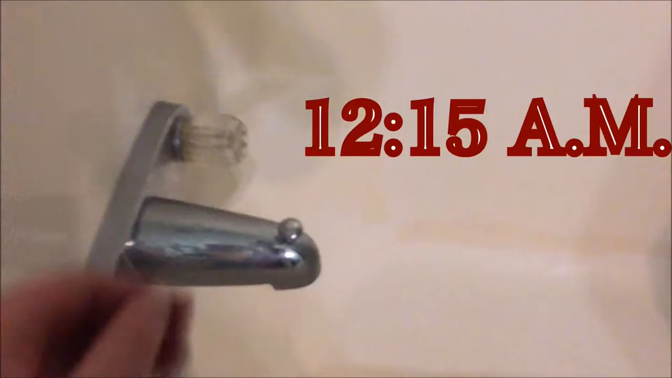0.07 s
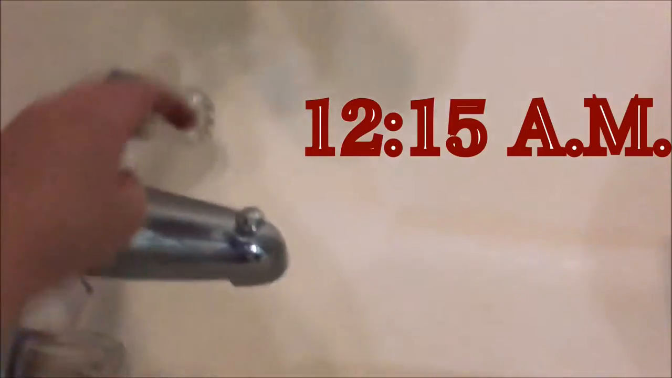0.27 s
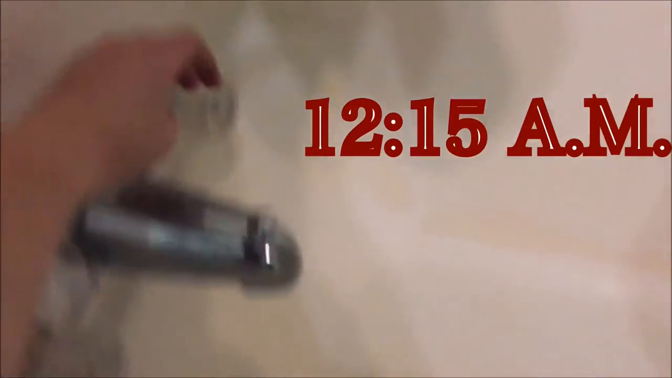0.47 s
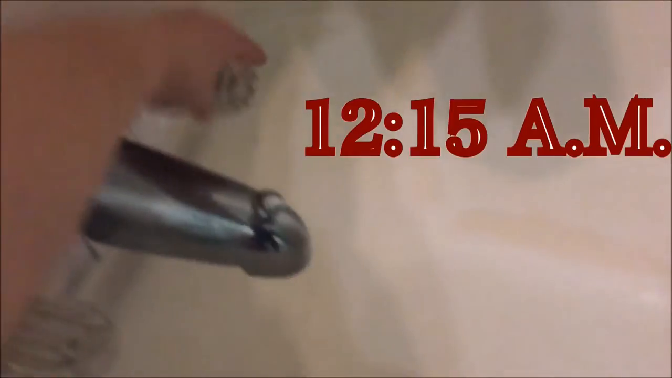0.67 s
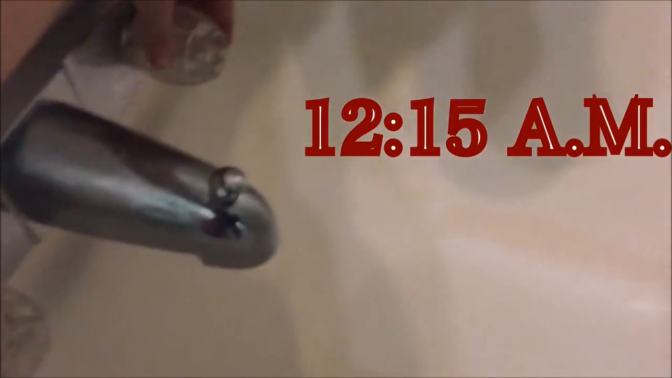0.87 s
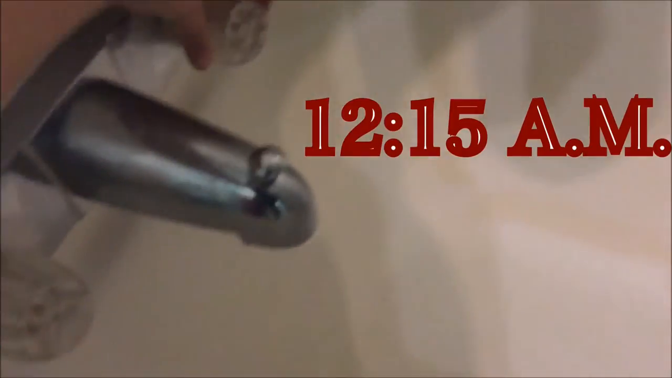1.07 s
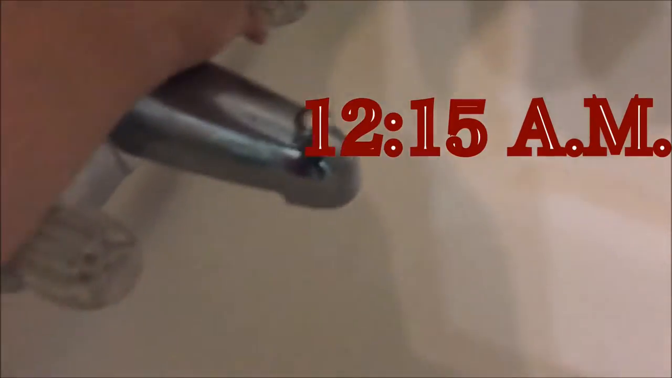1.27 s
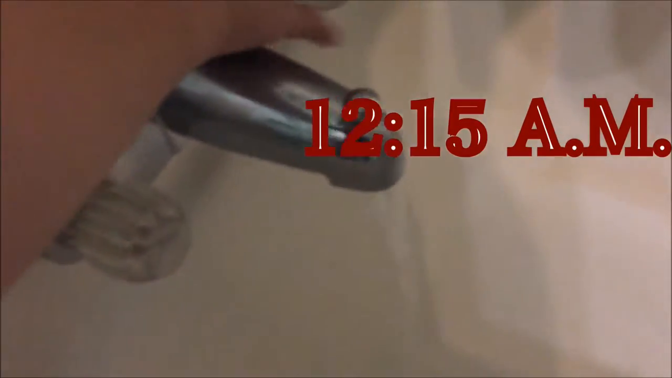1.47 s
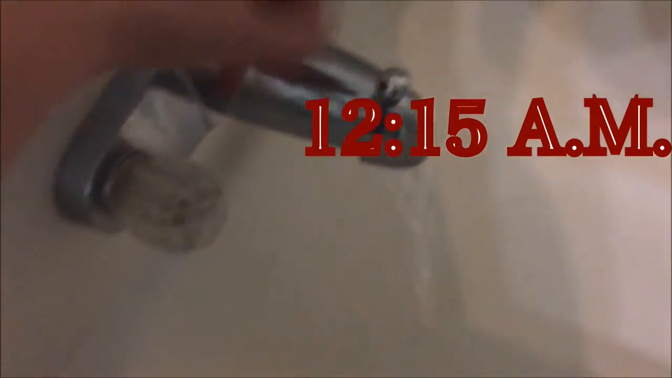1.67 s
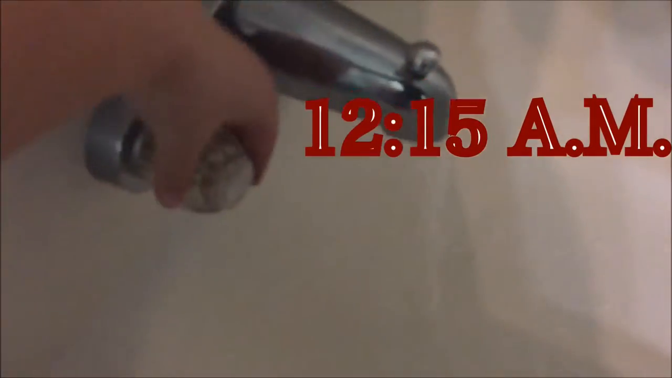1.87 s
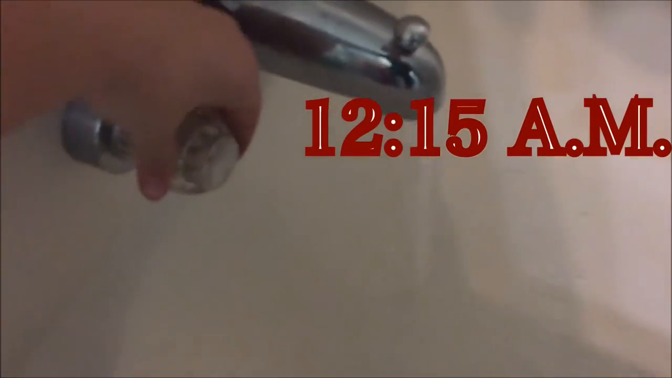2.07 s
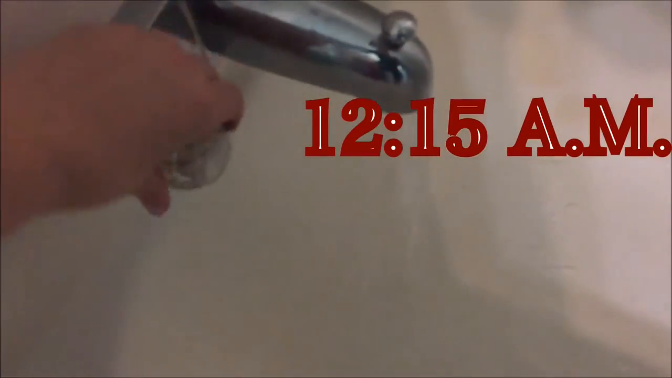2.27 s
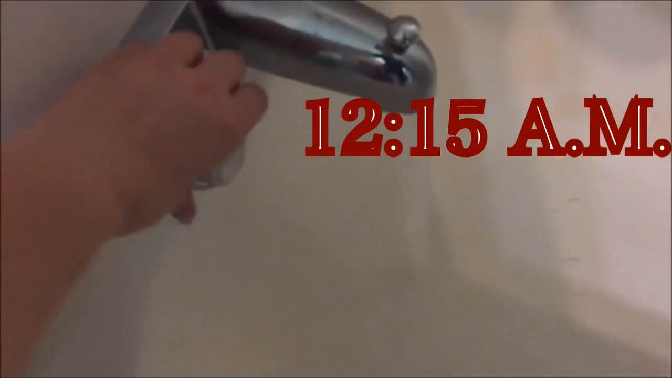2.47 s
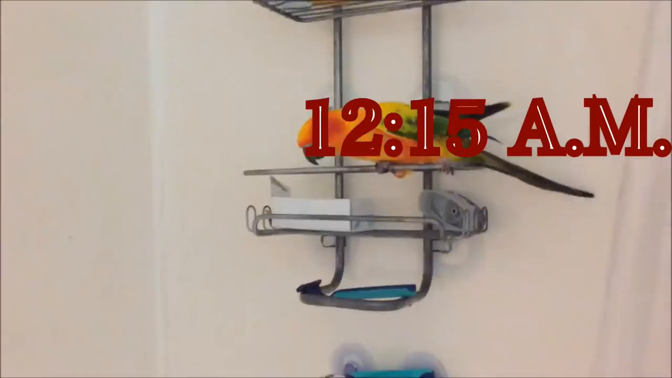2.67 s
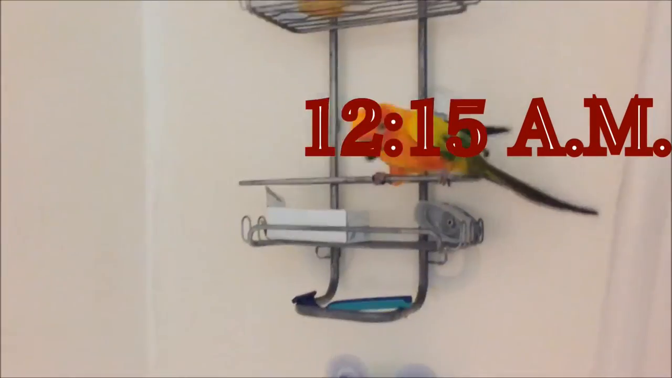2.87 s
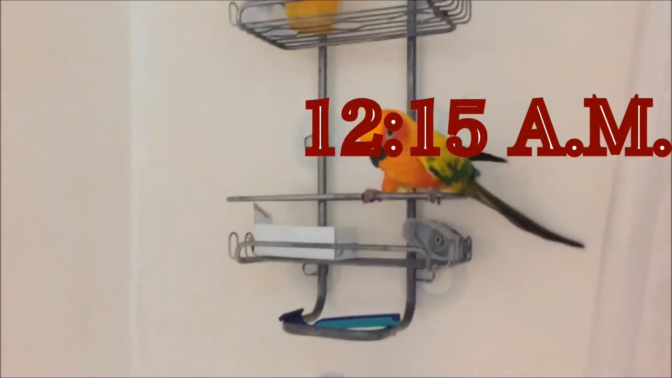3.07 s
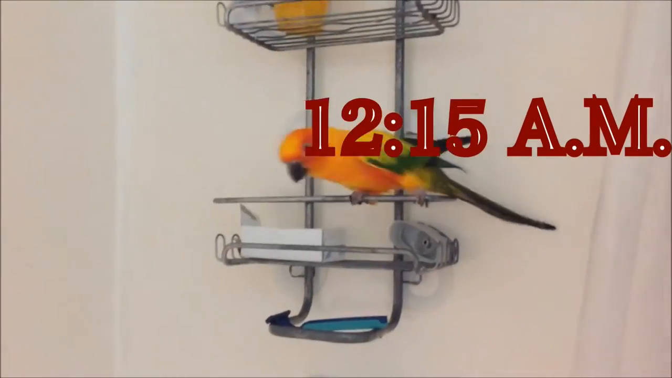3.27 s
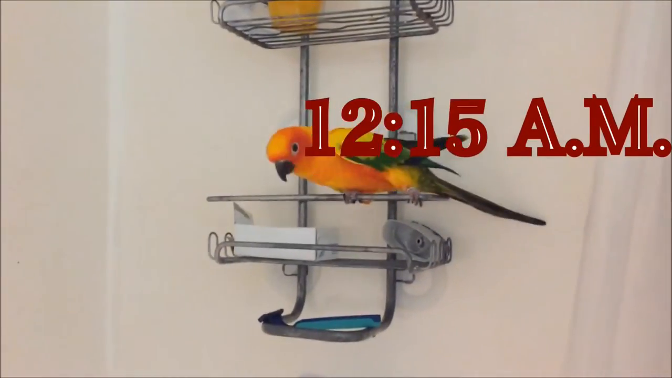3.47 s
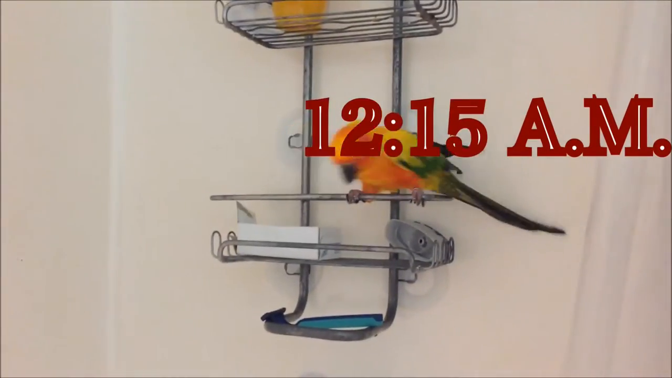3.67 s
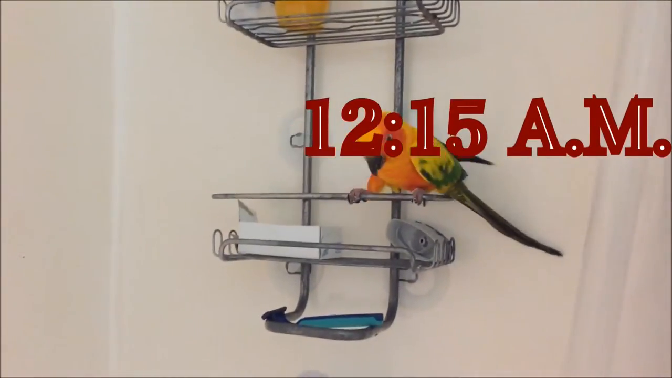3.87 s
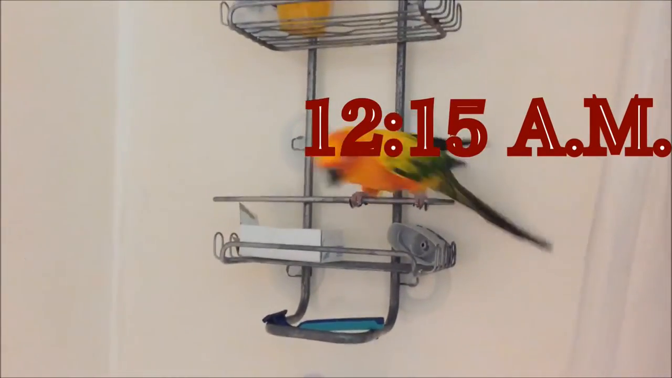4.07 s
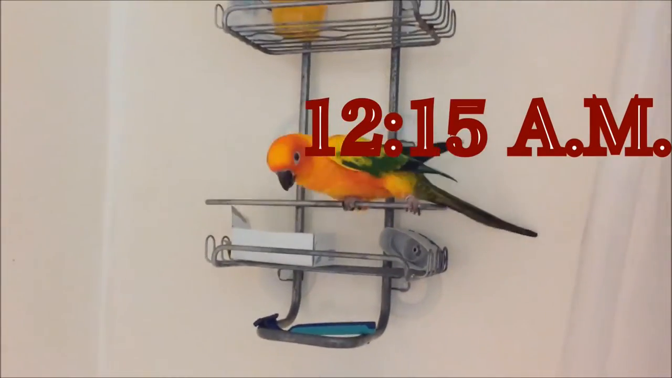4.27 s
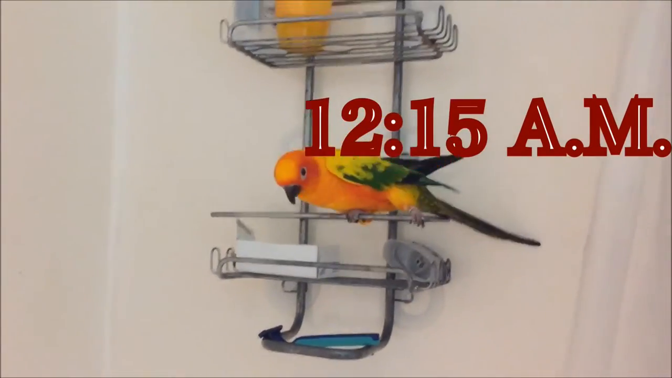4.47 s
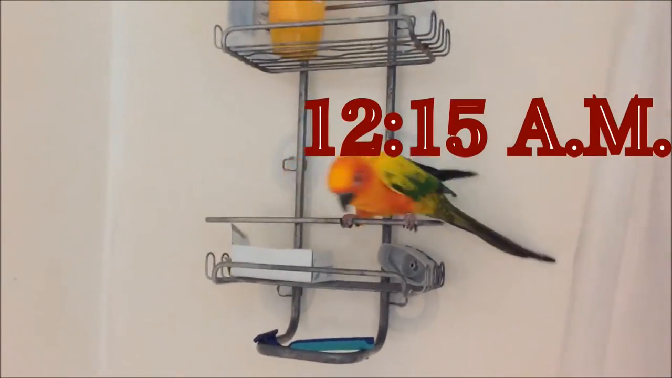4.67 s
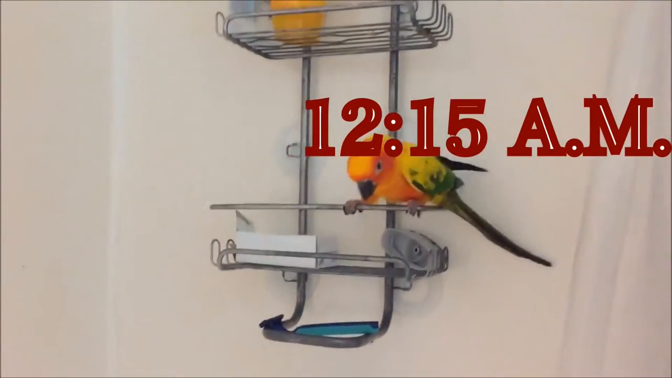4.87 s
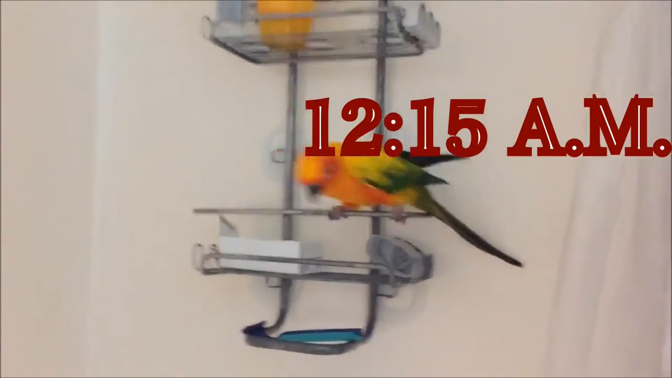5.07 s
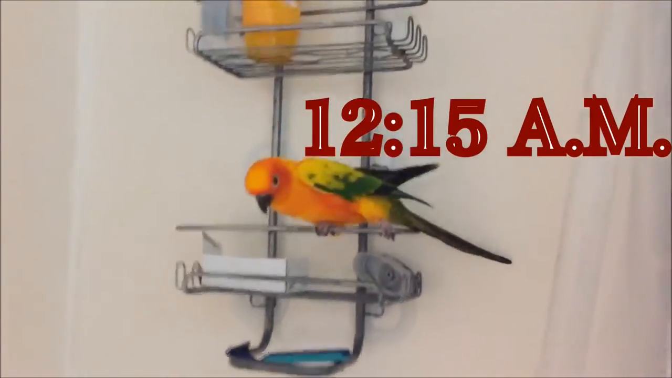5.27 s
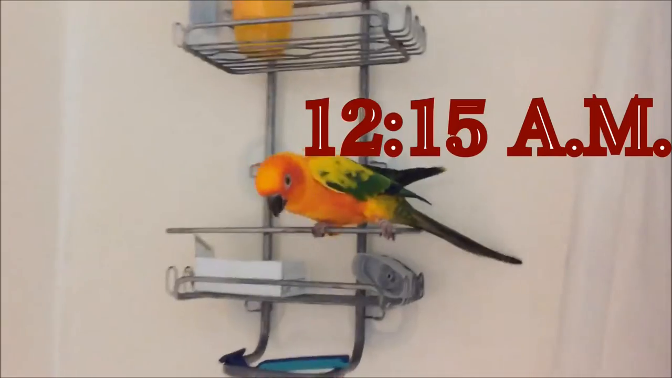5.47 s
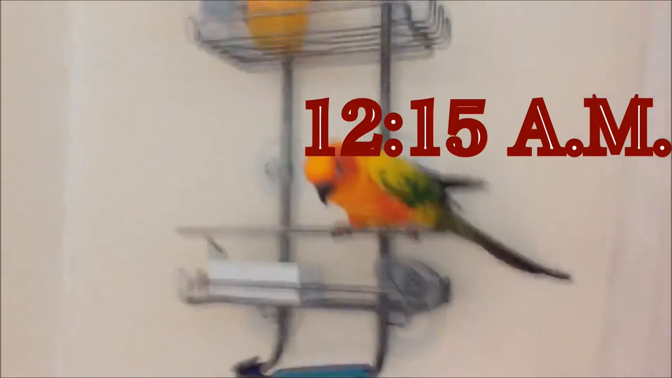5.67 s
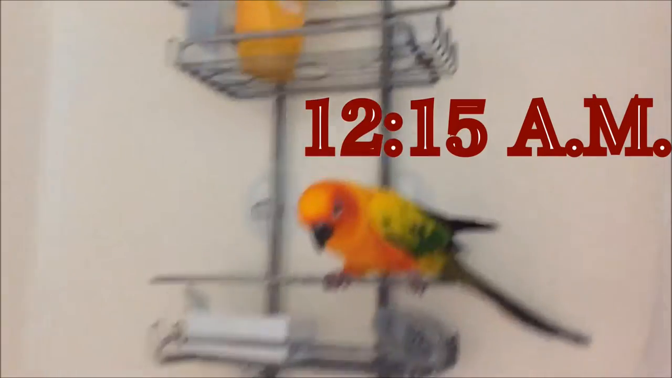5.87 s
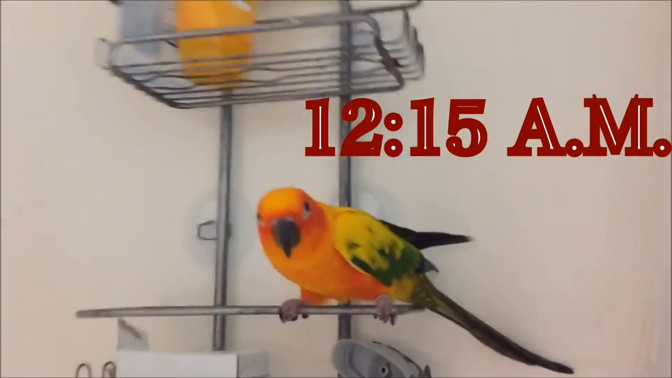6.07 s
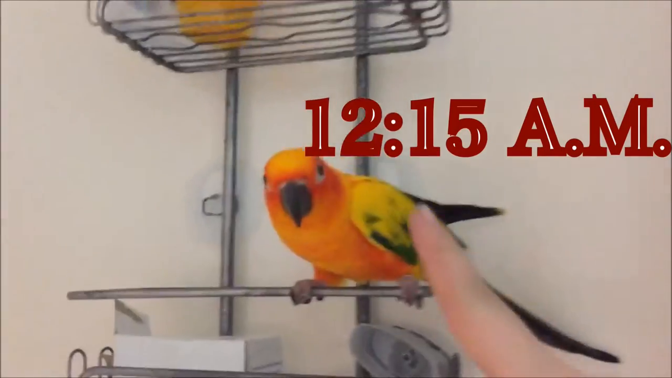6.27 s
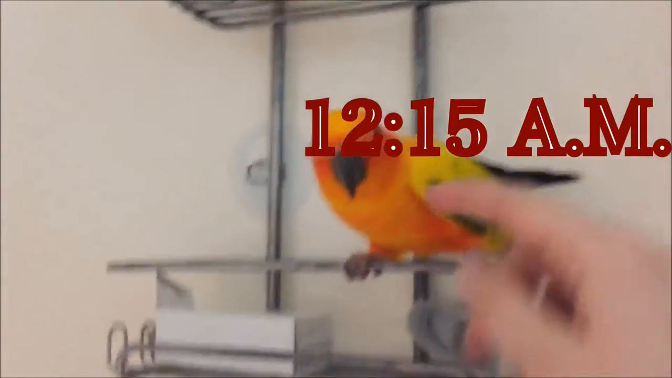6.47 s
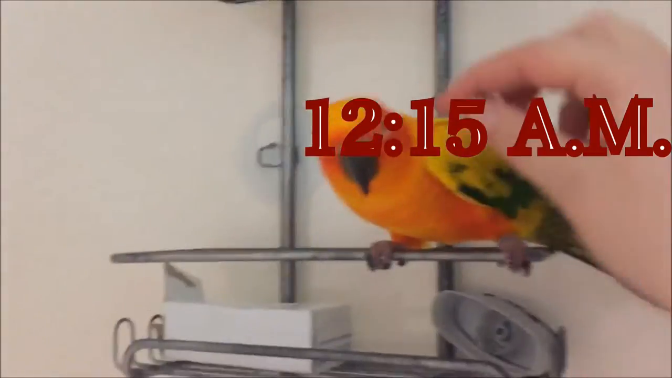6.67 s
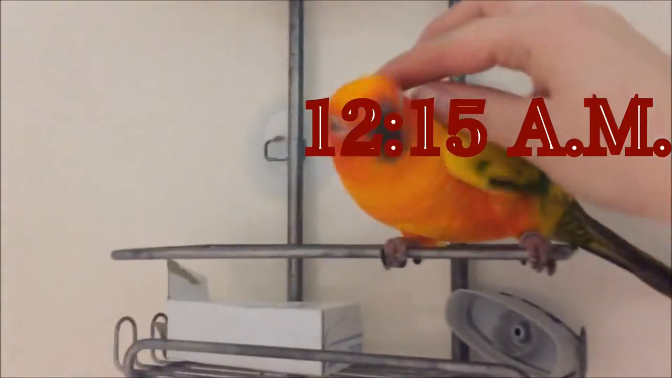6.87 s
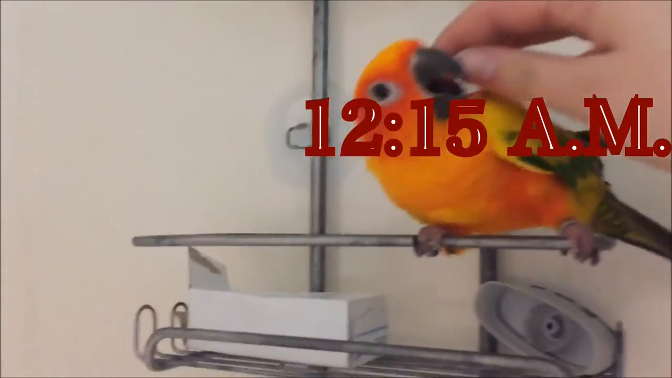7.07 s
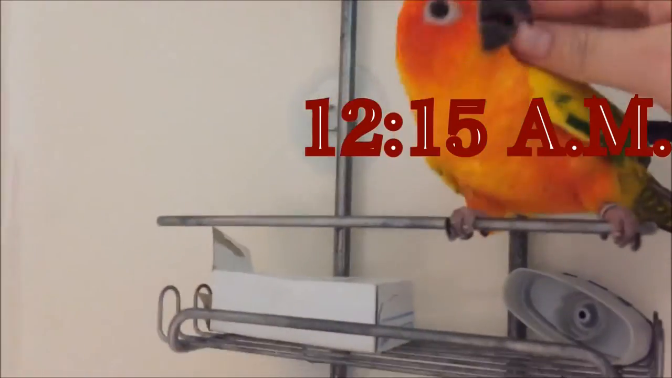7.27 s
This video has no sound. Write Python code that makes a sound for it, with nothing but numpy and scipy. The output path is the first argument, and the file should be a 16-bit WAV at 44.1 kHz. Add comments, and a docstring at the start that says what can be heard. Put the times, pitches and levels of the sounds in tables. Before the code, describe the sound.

Close to a bath spout: near silence, a cluster of metallic valve knocks with a low wall thud, then water spraying in, uneven as the knobs click sharply. Farther from the tap, the stream runs steadily with a hollow tub drone. Over it a parrot screeches, brief, nasal and harsh, with short bright tile echoes. After a gap comes one last, nearest blast. The automatic recording level pumps down after each call.

```python
"""A parrot on the shower rack gives seven piercing screeches: overtones of one pitch, shaped by its throat.
A bathtub tap is opened with a knock of the valve, modelled as a noise crack and decaying modes.
Water, as patchy noise and ringing drops, hisses into the tub while the knobs tick.
The tiles answer the parrot, knocks, ticks and squeaks with a short decaying tail.
Each screech overloads the recorder and pushes its gain down, so the water ducks and swells back."""
import sys
import numpy as np
from scipy import signal
from scipy.fft import rfft, irfft, next_fast_len
from scipy.io import wavfile
from scipy.ndimage import uniform_filter1d, minimum_filter1d, map_coordinates

SR = 44100
rng = np.random.default_rng(int(sys.argv[2]) if len(sys.argv) > 2 else 0)


def wav_out(sig):
    """Save sig, one row per channel (or a flat mono array), as 16-bit PCM at SR to the path in sys.argv[1]."""
    wavfile.write(sys.argv[1], SR, np.round(np.clip(np.atleast_2d(sig).T, -1, 1) * 32767).astype(np.int16))


N = 322371

# Screeches. Each row: start in seconds, length in seconds, pitch in Hz, initial pitch offset in Hz,
# level in dB, brightness 0-1, strength of the doubled period in dB, roughness of the ending 0-1,
# level of the hoarse catch before it in dB.
SCREECH_CALLS = [(2.965, .101, 942.7, 10.5, 10, 0.14, -1, 0.4, -17.5),
                 (3.361, 0.1, 940.6, -12, 9.5, 0.2, 1, 0.15, -7.5),
                 (3.771, 0.11, 939, 15, 9.5, 0, 1.5, 0.46, -8.5),
                 (4.22, 0.11, 939.2, 18.5, 8.5, 0, 1.5, 0.6, -50),
                 (4.926, 0.097, 940.4, -7, 13, 0.47, 3.5, 0.67, -12),
                 (5.42, 0.087, 931.4, 9.5, 8.5, 0.8, 1, 0.8, -50),
                 (7.085, 0.11, 1012, 15, 28, 0.6, -0.5, 0.25, -31)]
# Throat resonances. Each row: centre in Hz, width in Hz, boost in dB in a dull call, boost in dB in a bright call.
THROAT_RESONANCES = [(1900, 400, 1.5, 0), (2850, 400, 1, 2), (5690, 1700, 5.5, -0.5),
                     (8650, 370, -7.5, 7.5)]
# Overtones of the voice, before the throat: level in dB at 1 to 16 times the pitch.
VOICE_OVERTONES_DB = [-29, -6.5, -5.5, 3, -12, -3, -10.5, -6.5, -7, -15.5, -20.5, -20.5, -17, -15.5, -19,
                      -22.5]
SAG_S = 0.0436  # time constant (s) of the pitch settling
SNAP_HZ, SNAP_S = 173, .0016  # the note starts this much too high (Hz), decaying with this time constant (s)
ATTACK_S, RELEASE_S = 0.0027, 0.02  # rise and fall of the note
FADE_DB = -4  # change of level over the note's length
FALL_S, FALL_SHARE = 0.0122, 0.101  # the ending drops the pitch by this share in each such time (s)
CATCH_LEAD_S = .021  # the catch comes this long before the note
PARROT_WET_DB, DRIER_PER_DB = -4.3, 0.33  # the tiles' answer at level 0 dB; louder, nearer calls are drier

# Flow of the stream close by. Each row: time in seconds, nominal splash level in dB, nominal hiss level in dB.
NEAR_FLOW = [(1.2, -66, -57), (1.305, -35, -48.5), (1.335, -35, -27.5), (1.55, -29.5, -24),
             (1.72, -33, -27.5), (2.0, -34, -31), (2.2, -33.5, -30.5), (2.31, -37.5, -37),
             (2.38, -26, -29.5), (2.56, -28.5, -26), (2.65, -35, -19.5), (2.79, -23, -22)]
# Spectrum of the near stream. Each row: frequency in Hz, relative density in dB per Hz.
NEAR_SPECTRUM = [(210, -41), (350, -21), (410, -7), (590, -8), (864, -3.5), (1170, -2.5), (1500, 5.5),
                 (1880, -0.5), (2310, 4.5), (2930, -3), (4210, -5), (4860, -11), (5880, -6.5), (9160, -7),
                 (15400, -18)]
# Spectrum of the near drumming on the tub. Each row: frequency in Hz, relative density in dB per Hz.
NEAR_TUB_SPECTRUM = [(15, -53), (25, -49.5), (50, -9), (81, -10.5), (112, 2.5), (189, -11.5), (221, -8),
                     (313, -16), (413, -7.5), (460, -20.5), (600, -18.5), (780, -36), (1320, -120)]
# Spectrum of the stream from beside the rack. Each row: frequency in Hz, relative density in dB per Hz.
FAR_SPECTRUM = [(210, -62.5), (350, -17), (451, -12), (639, -15.5), (703, -13), (1040, -3.5), (1170, -10),
                (1820, -2), (2060, -2), (2970, 0.5), (4150, 0.5), (4940, -2.5), (5690, 1), (9010, -2),
                (15400, -13.5)]
# Spectrum of the drumming from beside the rack. Each row: frequency in Hz, relative density in dB per Hz.
FAR_TUB_SPECTRUM = [(15, -51), (25, -47), (63, 1), (114, 0.5), (161, -6.5), (224, -6.5), (253, -10),
                    (309, 2), (382, -17), (454, -20.5), (600, -16), (780, -28), (1320, -120)]
# Resonances of the tub under the stream. Each row: centre in Hz, width in Hz, relative level in dB.
TUB_RESONANCES = [(324, 8.7, -22), (650, 27, -24), (1214, 19, -18.5), (2050, 70, -12)]
OPEN_S = (1.2, 1.25)  # the first water leaves the spout: (from s, to s)
RUMBLE_LOW_DB, RUMBLE_DB = -51, -34.5  # drumming under the first trickle and at full flow
RUMBLE_BUILD_S = (1.26, 1.66)  # the drumming builds: (from s, to s)
TURN_S = 2.79  # from here on the water is heard from beside the rack
FAR_DB = -23.5  # the steady stream from beside the rack
DIP_S, DIP_WIDTH_S, DIP_DB = 2.86, 0.094, 12  # its level dips briefly at first

# Knocks of the valve. Each row: start in seconds, level in dB, relative thud in dB, relative metal ring in dB.
VALVE_KNOCKS = [(1.0335, -18, -8.5, 3), (1.073, -19.5, -3.5, -18.5), (1.1143, -14.5, -9, -32),
                (2.1613, -12.5, -19.5, -11), (2.170, -19.5, -17.5, 0.5)]
# Modes of the metal spout. Each row: frequency in Hz, relative level in dB, 60 dB decay time in seconds.
SPOUT_MODES = [(1356, -7, 0.1), (1660, -12, 0.062), (2450, -10, 0.07), (2850, -15, .08), (4300, 1, 0.018),
               (4590, -4, 0.0215), (5500, -3.5, 0.036), (5830, 1, 0.02)]
# Modes of the wall. Each row: frequency in Hz, relative level in dB, 60 dB decay time in seconds.
WALL_MODES = [(63, 6.5, 0.58), (109.4, 9.5, 0.49), (128.6, 4.5, 0.5), (162.8, 7.5, 0.4), (220, -6.5, 0.35)]
# Sharp ticks of the knobs. Each row: start in seconds, peak of the direct sound in dB, frequency in Hz.
KNOB_TICKS = [(.51, -52, 2200), (.631, -48, 655), (.665, -43, 4000), (1.8231, -4, 8350),
              (1.8956, -8.5, 8100), (1.949, -9.5, 8400), (2.048, -10, 3480), (2.0674, -5.5, 6500),
              (2.2334, -5, 7000), (2.3548, 2.5, 9030)]
GRIT_S = (1.72, 2.3)  # the knob creaks finely while it turns: (from s, to s)
# Short squeaks and gurgles. Each row: start in seconds, length in seconds, start in Hz, end in Hz, level in dB.
WATER_SQUEAKS = [(2.433, 0.031, 826, 935, -24.5), (6.493, 0.11, 1983, 2169, -28),
                 (6.556, 0.043, 495, 1102, -28)]
# Spectrum of the quiet bathroom. Each row: frequency in Hz, relative density in dB per Hz.
HUSH_SPECTRUM = [(15, -42), (25, -16), (69, -1.5), (322, -13.5), (358, -14.5), (495, -25), (597, -21),
                 (802, -23), (3820, -29), (15400, -34.5)]
# Reverberation of the tiles. Each row: frequency in Hz, 60 dB decay time in seconds.
TILE_DECAY = [(100, 0.66), (1000, 0.27), (4000, 0.23), (8000, 0.25), (15000, 0.051)]
TOP_HZ = 15750  # upper band limit of the recorder


def amp(db):
    """Definition of the decibel: 20 dB is a factor of ten in amplitude."""
    return 10 ** (np.asarray(db) / 20)


def unit(x):
    """Normalisation by mean power: scale to rms 1."""
    return x / np.sqrt(np.mean(x ** 2) + 1e-20)


def along(points, hz):
    """Interpolation of (Hz, value) points on a logarithmic frequency axis."""
    f, v = np.transpose(points)
    return np.interp(np.log(hz + 1), np.log(f + 1), v)


def clock(length):
    """Uniform sampling of time over a length in seconds."""
    return np.arange(int(length * SR)) / SR


def curves(rows):
    """Linear interpolation in time: one value per sample for each column after the time."""
    s, *cols = np.transpose(rows)
    return [np.interp(np.arange(N) / SR, s, c) for c in cols]


def wobble(rate, size=N):
    """Slow random modulation: a spline through random knots, rate of them a second."""
    knots = rng.standard_normal(int(size * rate / SR) + 4)
    return map_coordinates(knots, [np.arange(size) * rate / SR])


def filtered(x, response):
    """Linear filtering: the spectrum is multiplied by a response of frequency."""
    m = next_fast_len(len(x) + 8192)  # padding keeps the end from wrapping onto the start
    return irfft(rfft(x, m) * response(np.fft.rfftfreq(m, 1 / SR)), m)[:len(x)]


def coloured(x, spectrum):
    """Spectral shaping: x filtered by a table of levels, at rms 1."""
    return unit(filtered(x, lambda hz: amp(along(spectrum, hz))))


def add(track, s, sound):
    """Superposition: mix a sound into the track at time s."""
    part = track[round(s * SR):][:len(sound)]
    part += sound[:len(part)]


def ring(modes, t):
    """Modal decay: damped sines, each at a slightly random strength."""
    return sum(amp(db + rng.normal(0, 1.5) - 60 * t / t60) * np.sin(2 * np.pi * hz * t)
               for hz, db, t60 in modes)


def room(x, wet_db):
    """Reverberation: the direct sound and a dense tail whose decay depends on frequency."""
    hz, t, z = signal.stft(rng.standard_normal(SR // 2), SR, nperseg=256)
    decay = amp(-60 * t / along(TILE_DECAY, hz)[:, None])
    tail = signal.istft(z * decay, SR, nperseg=256)[1]
    tail *= np.arange(len(tail)) > .003 * SR  # the first reflections arrive after 3 ms
    response = amp(wet_db) * unit(tail) / np.sqrt(len(tail))
    response[0] = 1
    return signal.fftconvolve(x, response)


def screech(length, pitch_hz, sag_hz, bright, doubled_db, rough):
    """Source and filter: syrinx overtones with a doubled period pass the throat and end in a rough fall."""
    t = clock(length + 0.024)
    collapse = np.clip((t - length) / FALL_S, 0, 2)
    hz = pitch_hz + sag_hz * np.exp(-t / SAG_S) + SNAP_HZ * np.exp(-t / SNAP_S) + 2 * wobble(40.6, len(t))
    jitter = (.0035 + .08 * rough * collapse) * wobble(1600, len(t))
    hz = hz * (1 - FALL_SHARE * collapse + jitter)
    phase = 2 * np.pi * np.cumsum(hz) / SR
    doubled = amp(doubled_db) * np.clip((t - .004) / 0.0058, 0, 1)
    voice = np.zeros(len(t))
    for order, db in enumerate(VOICE_OVERTONES_DB, 1):
        throat_db = sum((dull_db + bright * (bright_db - dull_db)) * np.exp(-((order * pitch_hz - f) / w) ** 2)
                        for f, w, dull_db, bright_db in THROAT_RESONANCES)
        # phase lag grows with order; odd overtones come with the doubled period
        overtone = np.sin(order * phase - 0.305 * order ** 2) * (doubled if order % 2 else 1)
        overtone *= np.clip(t / 0.0052, 0, 1) ** (order / 2)  # high overtones build up later
        voice += amp(db + throat_db + 2.1 * wobble(25.6, len(t))) * overtone
    # a breathy rasp rides on the tone and grows as it collapses
    rasp = coloured(rng.standard_normal(len(t)),
                    [(800, -6), (2000, -5), (3500, 4), (5000, 0), (8000, 9.5), (15000, -29)])
    voice = unit(voice) + rasp * (amp(-26) + amp(-6) * rough * collapse)
    swell = np.clip(t / ATTACK_S, 0, 1) * np.clip((length + 0.017 - t) / RELEASE_S, 0, 1)
    return voice * swell * amp(FADE_DB * t / length)


def parrot():
    """Direct and reflected sound: each screech, after a hoarse catch of varying level, excites the tiles."""
    out, t = np.zeros(N), clock(0.04)
    for s, length, pitch_hz, sag_hz, db, bright, doubled_db, rough, catch_db in SCREECH_CALLS:
        call = screech(length, pitch_hz, sag_hz, bright, doubled_db, rough)
        add(out, s, amp(db) * room(call, PARROT_WET_DB - DRIER_PER_DB * db))
        puff = coloured(rng.standard_normal(len(t)),
                        [(400, -31.0), (1200, -3), (3000, 6.5), (4500, 3.5), (12000, -13.5)])
        age = t / 0.0021  # the puff peaks after 2.1 ms
        catch = puff * age * np.exp(1 - age)
        add(out, s - CATCH_LEAD_S, amp(catch_db) * room(catch, wet_db=-1.5))
    return out


def splashing(drop_hz, cycles, rate, drops_db, patchy_db):
    """Bubble acoustics: many tiny damped oscillations over spray noise in shifting patches."""
    z = signal.stft(rng.standard_normal(N), nperseg=512)[2]
    field = uniform_filter1d(rng.standard_normal(z.shape), size=5, axis=0)  # smooth in frequency
    field = uniform_filter1d(field, size=9, axis=1)  # and in time
    spray = unit(signal.istft(z * amp(patchy_db * unit(field)), nperseg=512)[1][:N])
    when, pitch, size = rng.random((int(rate * N / SR), 3)).T[:, :, None]
    k = np.arange(256)
    turns = drop_hz * 2 ** (3 * (pitch - .5)) * k / SR  # pitches span three octaves
    strength = (1.01 - size) ** -.55  # few strong drops among many weak ones
    drops = strength * np.exp(-turns / cycles) * np.sin(2 * np.pi * turns)
    patter = np.bincount(((when * N).astype(int) + k).ravel(), drops.ravel(), N)[:N]
    return spray + amp(drops_db) * unit(patter)


def near_water(t):
    """Turbulent noise in two bands: splash and hiss follow the flow, over drumming on the tub."""
    splash_db, hiss_db = curves(NEAR_FLOW)
    rumble_db = np.interp(t, RUMBLE_BUILD_S, [RUMBLE_LOW_DB, RUMBLE_DB])
    stream = coloured(splashing(drop_hz=4740, cycles=2.9, rate=1100, drops_db=-13, patchy_db=1.3),
                      NEAR_SPECTRUM)
    splash = filtered(stream, lambda hz: 1 / (1 + (hz / 3800) ** 4))
    hiss = stream - splash
    near = amp(splash_db - 0.36 + 1.3 * wobble(55)) * unit(splash)
    near += amp(hiss_db - 2.5 + 1.2 * wobble(120)) * unit(hiss)
    near += amp(rumble_db + 1.7 * wobble(20)) * coloured(rng.standard_normal(N), NEAR_TUB_SPECTRUM)
    return near * np.interp(t, OPEN_S, [0, 1])


def far_water(t):
    """Resonance under broadband excitation: a steady stream with drumming and narrow drones of the tub."""
    stream = coloured(splashing(drop_hz=3480, cycles=6, rate=2000, drops_db=-10, patchy_db=1.4), FAR_SPECTRUM)
    far = stream * amp(.8 * wobble(35))
    far += amp(-14.0 + 0.38 * wobble(8.5)) * coloured(rng.standard_normal(N), FAR_TUB_SPECTRUM)
    drone = filtered(rng.standard_normal(N),
                     lambda hz: sum(amp(db) / np.sqrt(w) / (1 + ((hz - f) / w) ** 2)
                                    for f, w, db in TUB_RESONANCES))
    far += amp(-15.0) * unit(drone)
    return far * amp(FAR_DB - DIP_DB * np.exp(-((t - DIP_S) / DIP_WIDTH_S) ** 2))


def water():
    """Change of listening position: the stream is heard close by, then from beside the rack."""
    t = np.arange(N) / SR
    return np.where(t < TURN_S, near_water(t), far_water(t))


def valve():
    """Impulsive excitation of modes: each knock cracks, rings the spout and thuds in the wall."""
    out, t = np.zeros(N), clock(.5)
    for s, db, thud_db, metal_db in VALVE_KNOCKS:
        crack = coloured(rng.standard_normal(len(t)),
                         [(200, -13.5), (1500, 2), (4000, -6.5), (8000, -11.0), (15000, -17)])
        crack *= amp(-60 * t / 0.032)
        metal = ring(SPOUT_MODES, t)
        metal = amp(metal_db + 9.5) * metal / np.abs(metal).max()
        add(out, s, amp(db) * room(crack + metal, wet_db=-4.5))
        thud = ring(WALL_MODES, t) * (1 - np.exp(-t / 0.0081))  # the wall yields gradually
        add(out, s, amp(db + thud_db - 9.0) * thud)
    return out


def knobs(grit_db, count):
    """Stick and slip: the turning knobs give a few sharp damped snaps among many faint ones."""
    out, t = np.zeros(N), clock(.03)
    grit = [(np.interp(when, [0, 1], GRIT_S), grit_db + 6 * size, 6000 * 2 ** pitch)
            for when, size, pitch in rng.random((count, 3))]
    for s, db, hz in [*KNOB_TICKS, *grit]:
        noise = filtered(rng.standard_normal(len(t)), lambda f: 1 / (1 + ((f - hz) / (0.27 * hz)) ** 2))
        snap = .5 * unit(noise) + np.sin(2 * np.pi * hz * t)
        snap *= np.exp(-t * hz / 7)  # a few cycles of the knob's ring
        add(out, s, amp(db) * room(snap / np.abs(snap).max(), wet_db=-6.5))
    return out


def squeaks():
    """Frequency modulation: faint tones glide unsteadily amid the splashing."""
    out = np.zeros(N)
    for s, length, start_hz, end_hz, db in WATER_SQUEAKS:
        t = clock(length)
        hz = np.linspace(start_hz, end_hz, len(t)) * (1 + 0.043 * wobble(175, len(t)))
        tone = np.sin(np.pi * t / length) * np.sin(2 * np.pi * np.cumsum(hz) / SR)
        add(out, s, room(amp(db) * tone, wet_db=-7.5))
    return out


def hush():
    """Stationary background noise: the quiet of the bathroom, with a slight slow wobble."""
    return amp(-62 + 0.7 * wobble(4.8)) * coloured(rng.standard_normal(N), HUSH_SPECTRUM)


def scene():
    """Superposition of sources: bird, water and tap over the quiet of the bathroom."""
    return (parrot() + water() + valve() + knobs(grit_db=-19.5, count=36) + squeaks() + hush())[None]


def gain_control(x, limit_db, slope, release_db, window, hold, attack):
    """Compression: loud sound pulls the gain down; after a hold it climbs by release_db a second."""
    power = np.abs(uniform_filter1d(x ** 2, int(window * SR) + 1))
    level_db = 10 * np.log10(power + 1e-12)
    half = int(hold * SR / 2)
    wanted_db = slope * np.minimum(limit_db - level_db, 0)
    held_db = minimum_filter1d(wanted_db, 2 * half + 1, origin=half)  # looks back over the hold
    climb = release_db * np.arange(N) / SR
    gain_db = np.minimum.accumulate(held_db - climb) + climb
    keep = np.exp(-1 / (attack * SR))
    return x * amp(signal.lfilter([1 - keep], [1, -keep], gain_db))


def record(dry):
    """Nonlinear transmission: initial silence, then gain control, a lopsided overload and the band limit."""
    x = dry[0] * (np.arange(N) > .15 * SR)
    x = gain_control(x, limit_db=-13.0, slope=0.7, release_db=28.5, window=0.0029, hold=0.1, attack=.0012)
    top = np.where(x > 0, 1.12, .95)  # the two polarities saturate at different heights
    x = x / (1 + np.abs(x / top) ** 8) ** (1 / 8)
    return filtered(x, lambda hz: hz < TOP_HZ)[None]


dry = scene()
out = record(dry)
wav_out(out)
```